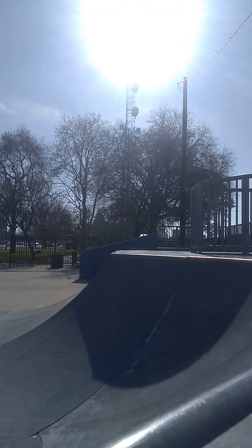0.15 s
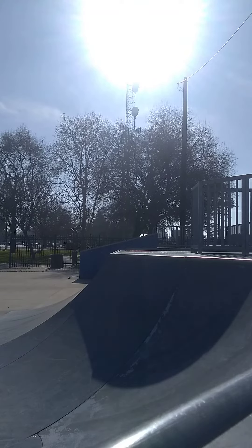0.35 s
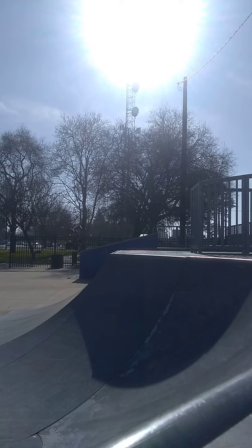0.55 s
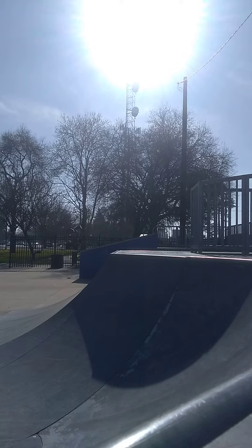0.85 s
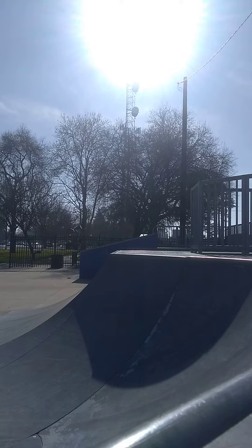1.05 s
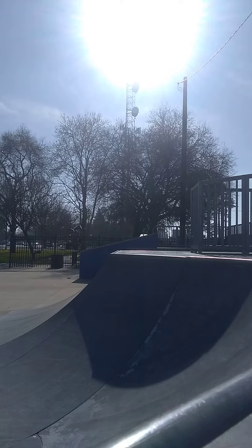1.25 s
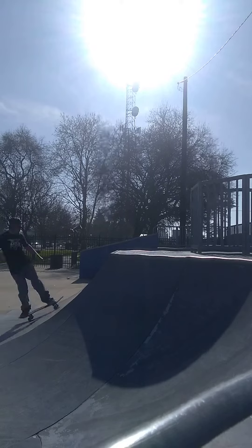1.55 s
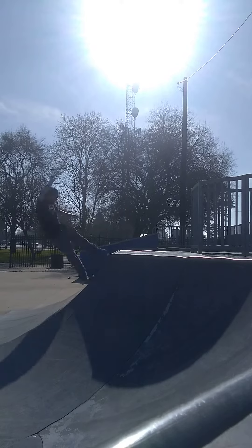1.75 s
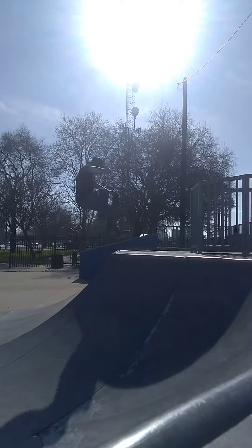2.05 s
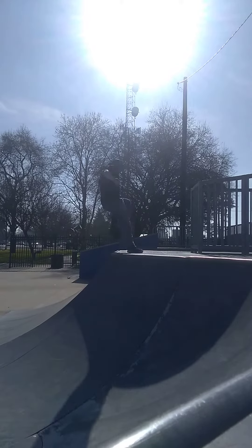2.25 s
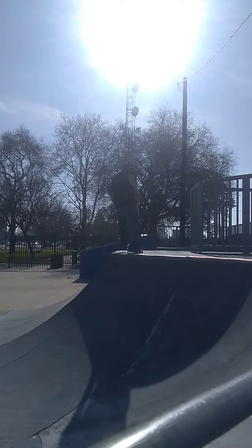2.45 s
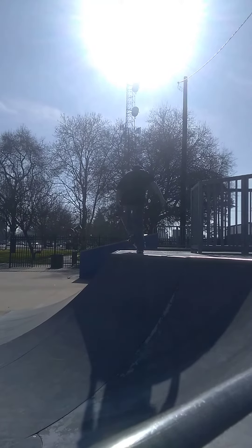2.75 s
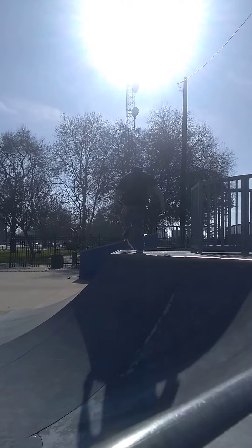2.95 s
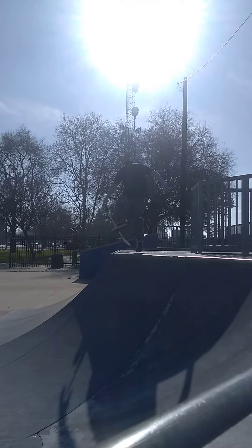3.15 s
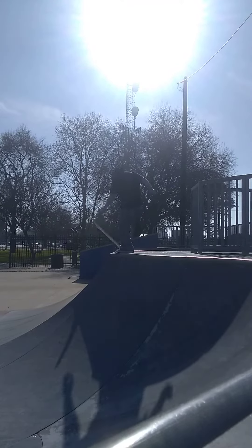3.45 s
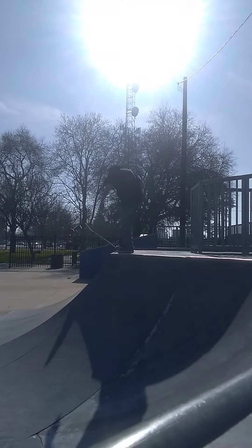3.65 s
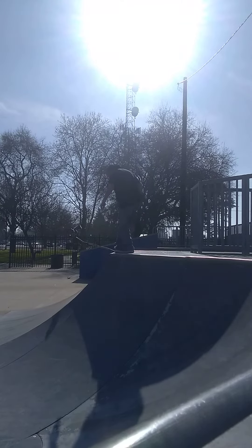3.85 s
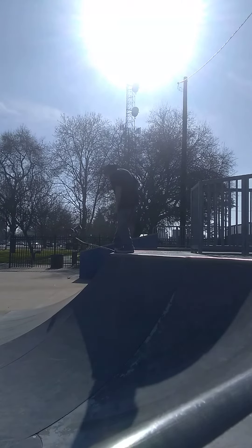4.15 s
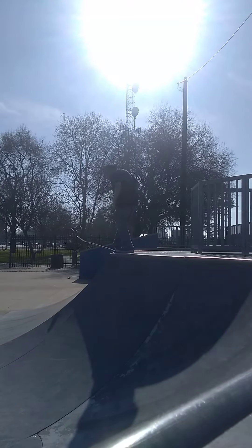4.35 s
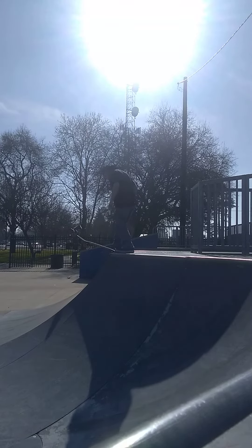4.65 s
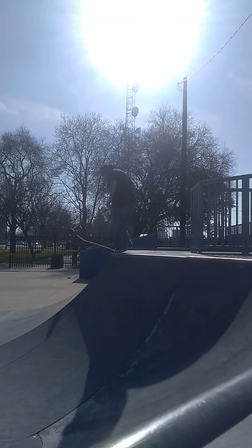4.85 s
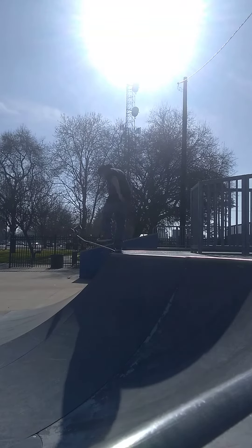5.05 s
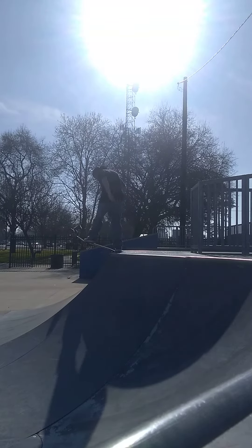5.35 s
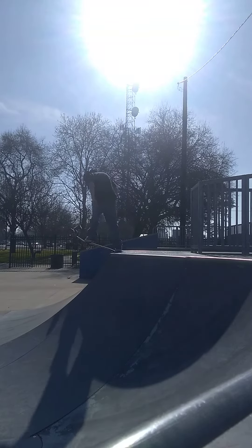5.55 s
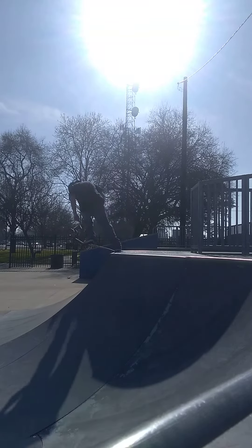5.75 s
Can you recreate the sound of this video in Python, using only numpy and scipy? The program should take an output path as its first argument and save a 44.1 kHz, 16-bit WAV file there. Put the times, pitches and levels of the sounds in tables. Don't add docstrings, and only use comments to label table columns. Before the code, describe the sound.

A skateboard rumbles close by, popping and slamming with hard wooden cracks, then rolls farther off over a booming hollow ramp before one last landing.

```python
import sys
import numpy as np
from scipy import signal
from scipy.io import wavfile

SR = 44100
rng = np.random.default_rng(int(sys.argv[2]) if len(sys.argv) > 2 else 0)


def persist_wave(psi):
    counts = np.round(np.clip(psi, -1, 1) * 32767).astype(np.int16)
    wavfile.write(sys.argv[1], SR, np.atleast_2d(counts).T)


def gain_from_db(level_db):
    decades = np.asarray(level_db, float) / 20
    return 10 ** decades


N = 273861

# start_s, wood_db, truck_db, edge_db, rattle_db (rattle over the crack)
HARD_BLOWS = [(0.2063, -30, -28.5, -43.5, -13), (0.2217, -17, -32, -39, -3.5), (0.3347, -21.5, -21, -45, 0),
              (0.344, -27, -22, -50.5, -15), (0.6702, -13, -19.5, -36.5, -3.5),
              (0.743, -14.5, -30, -41.5, 3.5), (0.7498, -31, -18, -57, 3.5), (1.414, -15.5, -32, -37.5, 3),
              (1.4235, -34, -18, -31, -5), (1.496, -49, -22.5, -48, 1), (1.5713, -30, -32.5, -67, -4),
              (1.6442, -30, -39, -71, 0.5), (1.9295, -42, -50, -56, -7.5), (1.934, -29, -48, -63.5, -5),
              (2.292, -44, -51.5, -67, 3.5), (2.367, -37.5, -61, -60.5, 1),
              (3.3282, -21.5, -35, -42.5, -1.5), (3.378, -11.5, -28, -40, -3.5),
              (3.431, -22.5, -36.5, -43.5, -6), (3.686, -27.5, -44.5, -61.5, -3.5),
              (3.848, -33, -63, -69, 9), (5.2697, -32, -43.5, -55, -2.5), (6.029, -20, -44, -62, 6.5),
              (6.039, -11, -25.5, -39, -18), (6.053, -27, -28, -71, -6)]
# start_s, wood_db, truck_db, edge_db
LIGHT_TAPS = [(0.077, -17, -67, -67), (0.0877, -44, -44, -47.5), (0.0928, -25, -45, -50),
              (0.1235, -47, -57, -58), (0.1375, -26.5, -43, -45.5), (0.1754, -50, -50, -50),
              (0.2095, -37, -49, -51), (.231, -40, -49, -62), (0.4654, -35, -46, -78),
              (.814, -42, -29, -70), (.883, -45, -36, -72), (1.439, -36, -30, -42.5),
              (1.459, -33, -28, -47), (1.478, -37, -28, -52.5), (1.515, -38, -30, -54),
              (1.532, -35, -38, -55.5), (1.553, -38, -37, -57.5), (1.592, -37, -39, -62),
              (2.258, -60.5, -54, -68.5), (2.33, -51.5, -57, -64), (2.349, -35, -54, -58),
              (2.384, -47, -60, -65.5), (3.303, -32.5, -51, -67), (3.319, -45, -55, -64),
              (.341, -42, -40, -52), (3.4, -27.5, -44, -61), (3.858, -52, -55, -70), (2.364, -55, -61, -66),
              (3.367, -26.5, -47, -59.5), (3.386, -27, -35.5, -52), (6.077, -30, -33, -65.5),
              (3.444, -30.5, -49, -65), (3.465, -39, -56, -70), (3.525, -30.5, -51, -63),
              (3.567, -39.5, -47, -64.5), (3.638, -44, -60, -69), (3.7252, -58, -50.5, -64),
              (3.813, -49, -72, -65), (4.082, -52, -58, -68), (5.375, -28, -76, -73),
              (5.5107, -39, -48, -61), (5.6222, -38, -40, -49.5), (5.807, -28.5, -48, -53),
              (5.976, -22, -60, -59), (6.0454, -37, -38, -57), (6.124, -27, -39.5, -71)]
TAP_RATTLE_DB = -7.5
# pitch_hz, width_hz, level_db
WOOD_THUD = [(285, 64, 2), (443, 92, 7), (508, 96, 0.5), (710, 76, -10.5), (734, 21, -12)]
DECK_KNOCK = [(990, 40, -13), (1021, 950, -1), (1185, 300, 2), (1488, 18, 7), (1740, 750, -9)]
TRUCK_RING = [(2250, 300, -8), (2520, 200, -3), (2730, 200, -1), (2930, 220, 0), (3150, 220, -1),
              (3400, 260, -3)]
EDGE_TICK = [(4750, 600, 1), (5300, 410, 12), (7000, 700, -4), (7940, 1200, -5.5), (9100, 1600, -21),
             (11800, 2200, -35)]
# low_hz, high_hz, rise_s, decay_s
PART_CRACKS = [
    (151, 810, 0.004, 0.005),
    (869, 1880, 0.0017, 0.0036),
    (2114, 3600, 0.001, 0.0031),
    (3740, 15000, 0.0004, 0.0032),
]
THUD_DB, KNOCK_DB, KNOCK_WOOD = -1.3, -1, 0.66


def struck_parts():
    table = [*HARD_BLOWS, *((*tap, TAP_RATTLE_DB) for tap in LIGHT_TAPS)]
    # resonances, tail_db, tail_t60_s
    tails = [(WOOD_THUD, 0, .16), (DECK_KNOCK, -3, .13), (TRUCK_RING, -2.5, .12), (EDGE_TICK, -3, .08)]
    out, t = 0, np.arange(SR // 2) / SR
    grit = rng.choice([-1, 1], (2, N))
    rattle = gain_from_db(2.5 * drift(160))
    for part, ((modes, tail_db, t60), (low, high, rise, decay)) in enumerate(zip(tails, PART_CRACKS)):
        snap, shake = np.zeros((2, N))
        for s, wood_db, truck_db, edge_db, rattle_db in table:
            start = round(s * SR)
            span = t[:N - start]
            knock_db = KNOCK_DB + KNOCK_WOOD * wood_db + (1 - KNOCK_WOOD) * truck_db
            level_db = [THUD_DB + wood_db, knock_db, truck_db, edge_db][part]
            onset = gain_from_db(level_db) * (1 - np.exp(-span / rise))
            snap[start:start + len(t)] += onset * 1.21 * np.exp(-span / decay)
            shake[start:start + len(t)] += onset * gain_from_db(rattle_db + tail_db - 60 * span / t60)
        crack = snap * grit * np.sqrt(SR / 2 / min(high - low, 3000))
        tail = resonate(shake * rattle * grit, modes)
        band = signal.butter(4, [low, high], "band", fs=SR, output="sos")
        shared, apart = signal.sosfilt(band, crack + tail + 1e-18)
        out = out + capsules(shared, apart, modes[2][0])
    return out


# start_s, pitch_hz, peak_db, length_s
DECK_POPS = [(0.3344, 2880, -13.5, 0.00056), (0.3445, 2950, -20, 0.00063), (.6695, 1340, -15, 0.00087),
             (0.672, 1370, -5, 0.0011), (.753, 2830, -19, 0.0008), (0.674, 214, -27, 0.0064),
             (0.742, 1270, -15.5, 0.0032), (0.745, 623, -17.5, 0.0043), (0.752, 464, -26, 0.0029),
             (0.768, 980, -33.5, 0.071), (1.4205, 2820, -16.5, .002), (1.425, 2770, -7, 0.0011),
             (1.439, 2800, -20, 0.0029), (1.491, 300, -15, 0.0018), (1.499, 330, -18, .0013),
             (1.574, 300, -26, 0.0014), (3.38, 600, -32, 0.00052), (3.468, 520, -19, 0.0014),
             (6.04, 334, -13.5, 0.0025), (3.33, 1384, -29, 0.003), (3.379, 1046, -18.5, 0.0028),
             (3.372, 525, -21, 0.0071), (3.398, 831, -30, 0.016), (3.415, 541, -24.5, 0.029),
             (3.449, 437, -18, 0.0082), (3.454, 541, -26, 0.0049), (3.522, 523, -22, 0.007),
             (3.812, 1670, -44, 0.0026), (3.842, 1510, -42, 0.0027), (6.03, 380, -9.5, 0.0031),
             (6.038, 2980, -29.5, 0.0017), (6.038, 587, -15, 0.0017), (6.04, 1300, -28.5, 0.0015)]


def pops():
    out, t = np.zeros(N), np.arange(SR // 4) / SR
    for s, hz, db, length in DECK_POPS:
        start = round(s * SR)
        swell = (t / length * np.exp(1 - t / length)) ** 2
        ring = gain_from_db(db) * swell * np.sin(2 * np.pi * hz * t)
        out[start:start + len(t)] += ring[:N - start]
    return out


# delay_s, level_db
PARK_ECHOES = [
    (.013, -16),
    (.029, -20),
]
ON_DECK_S, OFF_DECK_S, FAR_CUT_HZ = 1.7, 5.9, 7500


def blows():
    direct = signal.sosfilt(signal.butter(2, 5500, fs=SR, output="sos"), struck_parts())
    far = signal.sosfilt(signal.butter(2, FAR_CUT_HZ, fs=SR, output="sos"), direct)
    sample = np.arange(N)
    on_deck = (sample > ON_DECK_S * SR) & (sample < OFF_DECK_S * SR)
    direct = np.where(on_deck, far, direct)
    dull = signal.lfilter([.4], [1, -.6], direct)
    echoes = 0
    for s, db in PARK_ECHOES:
        echoes = echoes + gain_from_db(db) * np.pad(dull, ((0, 0), (round(s * SR), 0)))[:, :N]
    return direct + echoes + pops() * gain_from_db([[-2.5], [0]])


# start_s, nearness_db, brightness_db (brightness follows speed)
WHEEL_PASSES = [(0.0, 0.5, -2), (.45, -1.5, 0.5), (.9, -0.5, -3.5), (1.4, -1, 0.5), (1.75, -10, -8),
                (2.2, -21, 0.5), (2.4, -18.5, 5.5), (2.7, -19.5, 0), (3.0, -20.5, 2), (3.3, -17.5, 6),
                (3.65, -12, -3.5), (4.2, -19, -1), (4.5, -10.5, -9.5), (5.0, -12, -0.5), (5.4, -7.5, -3),
                (5.65, -3.5, -6), (6.0, -3.5, -4), (6.21, -6.5, -8)]
# level_db, nearness_share, brightness_share
WHEEL_PARTS = [
    (-21, 2.04, -0.68),
    (-36.5, 0.83, -0.1),
    (-48, 1.21, 1),
    (-63, 0.76, 1),
    (-64.5, 0.53, .55),
]
# start_s, sheets_db, low_skid_db, high_skid_db, spray_db
BOARD_SLAMS = [
    (.68, -49.5, -31, -37.5, -78),
    (0.753, -40.5, -32, -37, -72),
    (1.417, -9.5, -23, -25.5, -34),
    (1.498, -39.5, -41.5, -44.5, -67),
    (1.93, -47.5, -44, -59.5, -66),
    (2.345, -47, -62.5, -65, -71.5),
    (3.334, -12, -35.5, -50.5, -78),
    (3.38, -27, -34.5, -44.5, -79),
    (6.036, -19, -23.5, -48, -81),
]
# level_db over the skid, t60_s
SKID_PARTS = [
    (14.5, 0.18),
    (0, 0.89),
    (0, 0.52),
    (-0.5, 0.28),
    (-7.5, .12),
]
SKID_RISE_S, SKID_CHATTER_DB = 0.0052, -1


def wheel_levels(chatter):
    near_db, bright_db = in_time(WHEEL_PASSES)
    s, _, low_db, high_db, spray_db = np.transpose(BOARD_SLAMS)
    slides_db = [low_db, low_db, high_db, spray_db, spray_db]
    levels_db = []
    for (db, near, bright), slide_db, (over_db, t60) in zip(WHEEL_PARTS, slides_db, SKID_PARTS):
        rolling = gain_from_db(db + near * near_db + bright * bright_db)
        skid = dying(s, slide_db + over_db, SKID_RISE_S, t60) * gain_from_db(SKID_CHATTER_DB * chatter)
        levels_db.append(20 * np.log10(np.hypot(rolling, skid)))
    return levels_db


# pitch_hz, density_db (per Hz)
WHEEL_SPECTRUM = [(45, -11.5), (75, -5), (110, -1.5), (160, 1), (230, -5.5), (350, -12), (500, -16.5),
                  (750, -24.5), (1100, -26.5), (1600, -31.5), (2200, -35.5), (3300, -44), (5000, -58.5),
                  (14000, -74.5)]
# pitch_hz, density_db (per Hz)
MIC_HISS = [(1000, -113), (4000, -125), (7000, -127), (14000, -131)]


def wheels():
    centres_hz = np.log([200, 900, 3000, 7500, 13000])
    offsets_db = [-23.5, -8.5, 6.5, 18.5, 20.5]
    edges = 40 * 2 ** np.arange(0, 8.7, .4)
    out, together = 0, drift(55)
    levels_db = wheel_levels(together)
    white = rng.standard_normal((2, 2, N))
    for k, (low, high) in enumerate(zip(edges, edges[1:])):
        hz = np.sqrt(low * high)
        band = signal.butter(2, [low, high], "band", fs=SR, output="sos")
        shared, apart = signal.sosfilt(band, white[k % 2])
        place = np.interp(np.log(hz), centres_hz, range(5))
        below = min(int(place), 3)
        lower_db = levels_db[below] + offsets_db[below]
        upper_db = levels_db[below + 1] + offsets_db[below + 1]
        level_db = lower_db + (place - below) * (upper_db - lower_db)
        flicker_db = (0.35 + .5 * place) * together + 1.9 * drift(16)
        grit = gain_from_db(level_db + at_hz(WHEEL_SPECTRUM, hz) + flicker_db)
        density = np.hypot(grit, gain_from_db(at_hz(MIC_HISS, hz)))
        out = out + density * np.sqrt(SR / 2) * capsules(shared, apart, hz)
    return out


# start_s, rocking_db (frame), shuffle_db (sheets)
RIDER_LOAD = [(0.0, -33, -34), (0.3, -21.5, -40.5), (1.0, -48, -35), (1.4, -21, -46), (1.46, -10.5, -17.5),
              (2.1, -15, -23), (2.75, -12.5, -26.5), (3.28, -10.5, -33.5), (3.42, -7.5, -23),
              (4.0, -14, -26), (4.6, -16.5, -24.5), (5.35, -17, -29.5), (5.55, -17, -35.5),
              (5.95, -17, -42), (6.08, -16, -18), (6.21, -23, -15)]
# start_s, level_db
FOOTFALLS = [(.36, -13.5), (1.15, -14.5), (1.48, -5), (2.02, -7), (2.35, -4), (2.481, -11.5), (2.9, -2),
             (3.23, -15.5), (3.36, -17.5), (3.57, -8.5), (3.69, -13), (4.659, -8.5), (5.0, -10.5),
             (5.1, -22.5), (5.44, -13.5), (5.87, -14), (6.08, -5)]
# pitch_hz, width_hz, slope_db, deck_db, far_edge_db (by rider stance)
FRAME_BOOM = [(58.7, 10, -12.5, -16, -15.5), (92.7, 16.8, -6.5, -7, -3.5), (110, 11.6, 1.5, 0, -1),
              (127.7, 17.7, -5.5, -10, -5.5), (151.6, 5.7, -8.5, -5.5, 1.5), (170.7, 10, -7, -15.5, -9.5),
              (202.9, 12, -13, -22.5, -13.5)]
SHEET_MODES = [(241.3, 9.3, -5, -7, -3), (286.7, 8.8, -4, -5.5, 5), (292.7, 37, -9, -6.5, -5.5),
               (346.2, 7, -14, 3, -5.5), (380, 8.6, -28, -4, -22), (405, 14.6, -9.5, -8, 2),
               (425.2, 16, -13.5, -5, -3), (446.7, 28, -18, -11.5, -9), (473, 45, -23, -15, -23.5),
               (552, 3.3, -20.5, -9.5, -28), (673, 11, -31.5, -33, -27), (743, 4.2, -26, -21, -26.5)]
STEP_RISE_S, STEP_T60_S = 0.016, 0.63
SHEET_RISE_S, SHEET_T60_S = 0.027, 0.95


def ramp():
    rocking_db, shuffle_db = in_time(RIDER_LOAD)
    step_s, step_db = np.transpose(FOOTFALLS)
    slam_s, sheet_db = np.transpose(BOARD_SLAMS)[:2]
    rocking = np.hypot(gain_from_db(rocking_db), dying(step_s, step_db, STEP_RISE_S, STEP_T60_S))
    shaking = np.hypot(gain_from_db(shuffle_db), dying(slam_s, sheet_db, SHEET_RISE_S, SHEET_T60_S))
    bumps = rng.standard_normal((2, N))
    boom = resonate(rocking * gain_from_db(0.83 * drift(3.2)) * bumps[0], FRAME_BOOM)
    sheets = resonate(shaking * gain_from_db(0.27 * drift(27)) * bumps[1], SHEET_MODES)
    band = signal.butter(3, [52, 760], "band", fs=SR, output="sos")
    return signal.sosfilt(band, boom + sheets) * gain_from_db([[0], [-24]])


STANCE_S = [2.4, 4.2, 5.5]


def resonate(x, modes):
    out, power = 0, 0
    for k, (hz, width, *db) in enumerate(modes):
        r = np.exp(-np.pi * width / SR)
        level_db = db[0] if len(db) == 1 else np.interp(np.arange(N) / SR, STANCE_S, db)
        gain = gain_from_db(level_db)
        poles = [1, -2 * r * np.cos(2 * np.pi * hz / SR), r * r]
        peak = signal.lfilter([1, 0, -1], poles, x + 1e-18)
        out = out + (-1) ** k * gain * (1 - r * r) / 2 * peak
        power = power + gain ** 2 * (1 - r * r) / 2
    return out / np.sqrt(power)


def dying(s, db, rise, t60):
    clicks = np.full(N, 1e-18)
    np.add.at(clicks, (np.asarray(s) * SR).astype(int), gain_from_db(db))
    r, smooth = gain_from_db(-60 / (t60 * SR)), np.exp(-1 / (rise * SR))
    return signal.lfilter([1 - smooth], np.convolve([1, -r], [1, -smooth]), clicks)


def drift(rate):
    r = np.exp(-2 * np.pi * rate * 40 / SR)
    slow = signal.lfilter([1], [1, -2 * r, r * r], rng.standard_normal(N // 40 + 2002))[2000:]
    return np.interp(np.arange(N) / 40, np.arange(len(slow)), rms_one(slow))


def rms_one(x):
    return x / np.sqrt(np.mean(x ** 2) + 1e-20)


def in_time(rows):
    s, *columns = np.transpose(rows)
    return [np.interp(np.arange(N) / SR, s, c) for c in columns]


def at_hz(points, hz):
    points_hz, values = np.transpose(points)
    return np.interp(np.log(hz), np.log(points_hz), values)


# pitch_hz, likeness (-1 to 1)
CAPSULE_LIKENESS = [(60, 0.61), (250, 0.79), (700, 0.97), (1400, 0.61), (2200, 0.42), (3000, -0.3),
                    (4500, -0.43), (7500, 0.12), (14000, -0.63)]
# pitch_hz, level_db
RIGHT_OVER_LEFT = [(200, 0), (1000, 0), (2000, 3), (2900, 2), (3900, 7), (5000, 3), (6200, 5), (8000, 1)]


def capsules(shared, apart, hz):
    alike = np.clip(at_hz(CAPSULE_LIKENESS, hz), -1, 1)
    pair = np.sqrt((1 + alike) / 2) * shared + np.sqrt((1 - alike) / 2) * apart * [[-1], [1]]
    return pair * [[gain_from_db(-at_hz(RIGHT_OVER_LEFT, hz))], [1]]


def scene():
    return blows() + wheels() + ramp()


def low_pass(x):
    return signal.sosfilt(signal.butter(12, 14420, fs=SR, output="sos"), x)


CROSS_GAIN, CROSS_LAG = .8, 20
CUTOFF_HZ = 15300


def record(dry):
    late = signal.lfilter(np.r_[np.zeros(CROSS_LAG), .16, .34, .34, .16], [1], dry)
    wide = 1.144 * np.tanh((dry - CROSS_GAIN * late[::-1]) / 1.301)
    wide = signal.sosfilt(signal.cheby2(10, 40, CUTOFF_HZ, fs=SR, output="sos"), wide)
    fade = np.sin(np.pi / 2 * np.minimum(np.arange(N)[::-1] / 260, 1)) ** 2
    return low_pass(wide * fade)


dry = scene()
out = record(dry)
persist_wave(out)
```